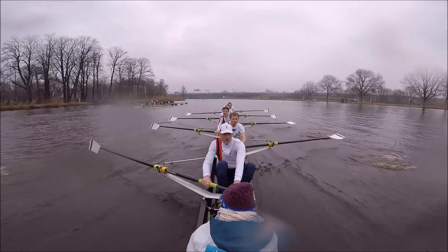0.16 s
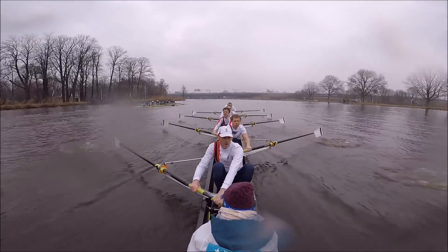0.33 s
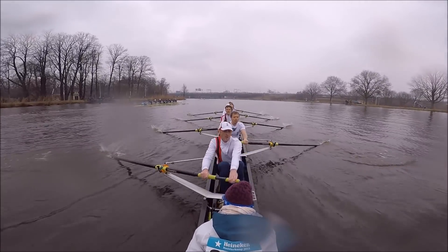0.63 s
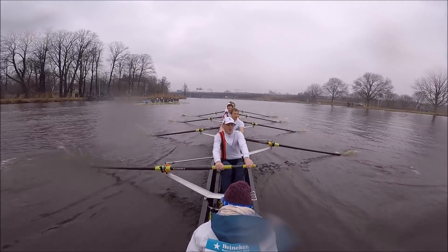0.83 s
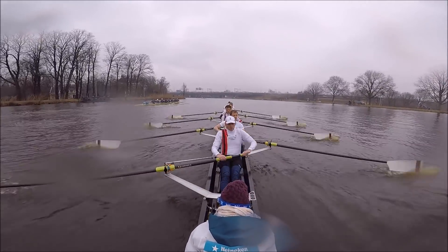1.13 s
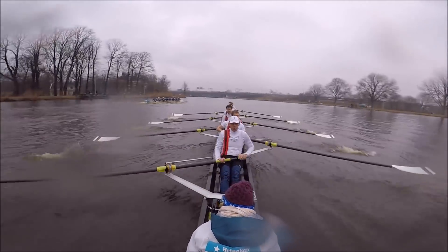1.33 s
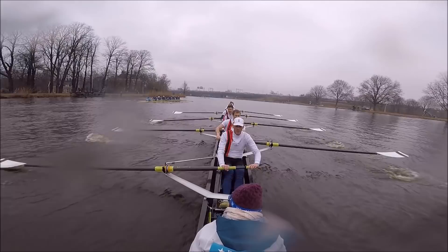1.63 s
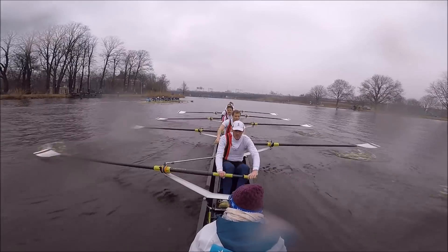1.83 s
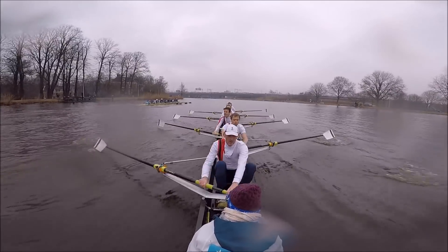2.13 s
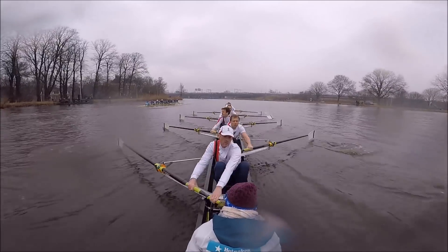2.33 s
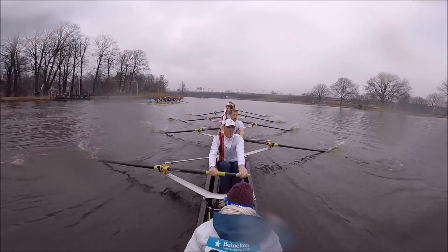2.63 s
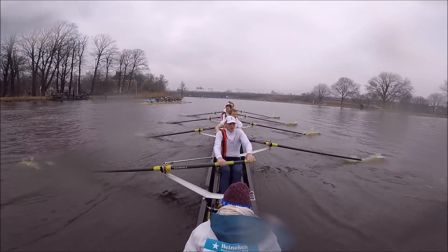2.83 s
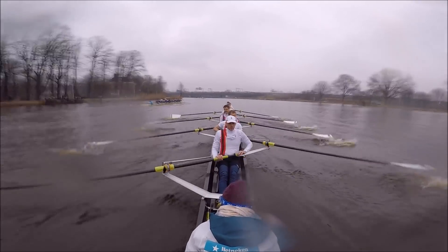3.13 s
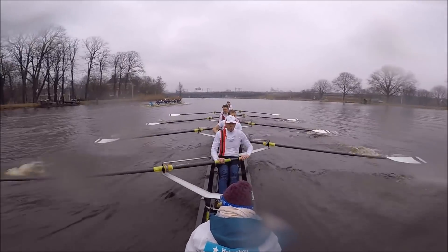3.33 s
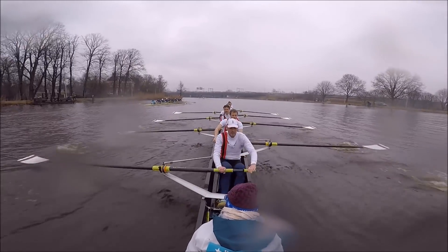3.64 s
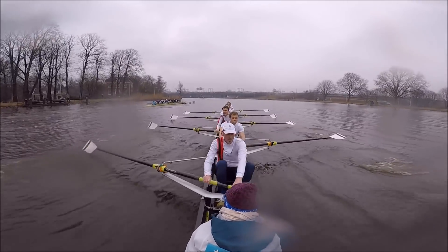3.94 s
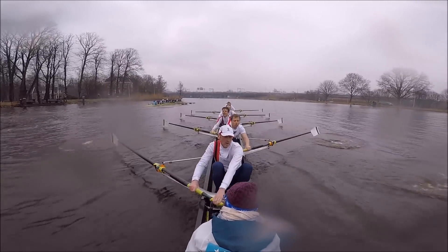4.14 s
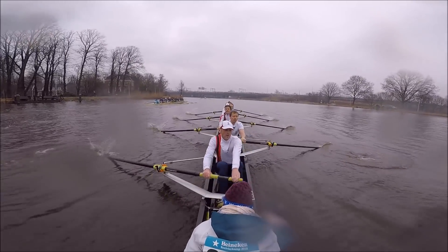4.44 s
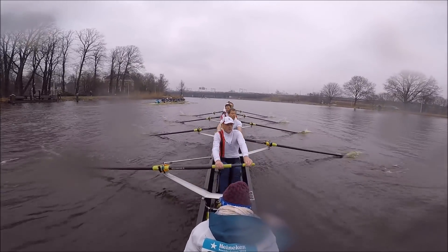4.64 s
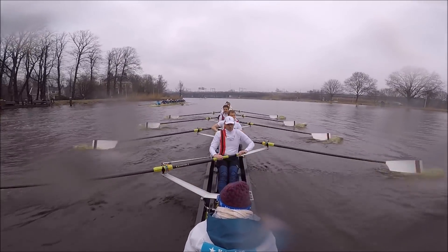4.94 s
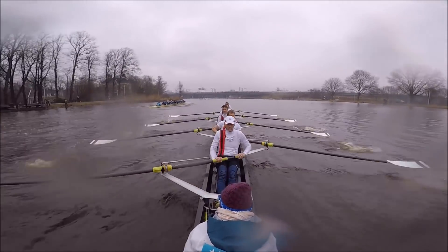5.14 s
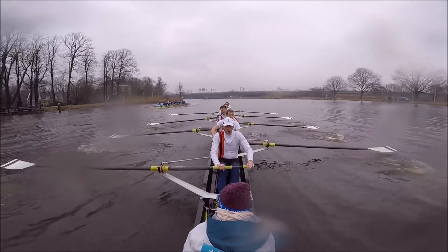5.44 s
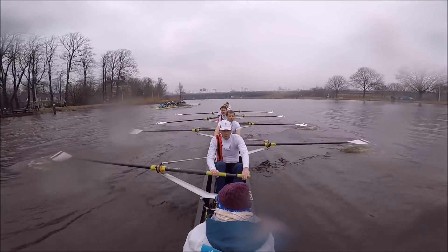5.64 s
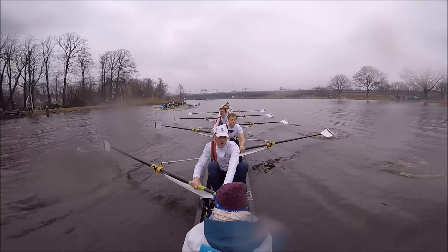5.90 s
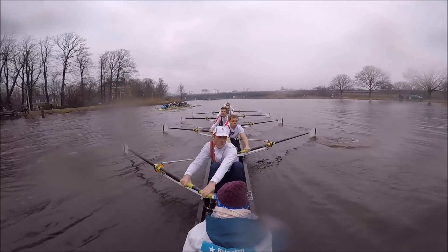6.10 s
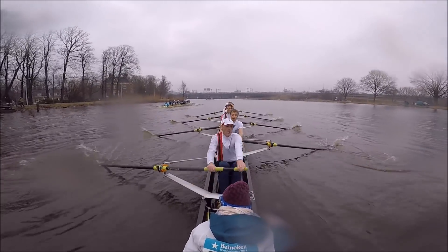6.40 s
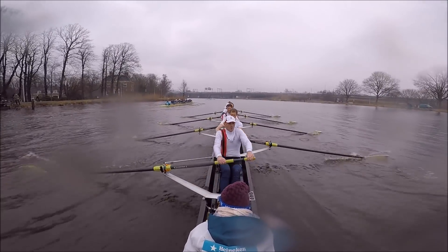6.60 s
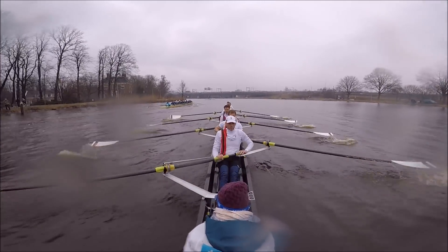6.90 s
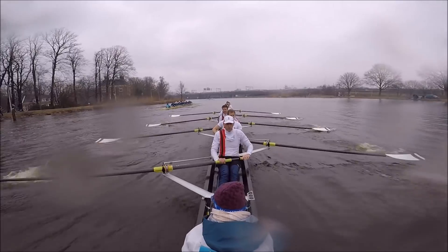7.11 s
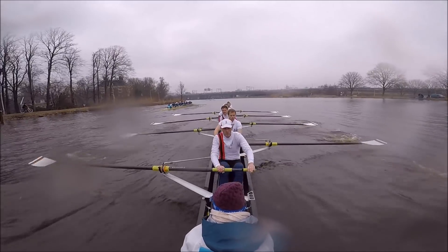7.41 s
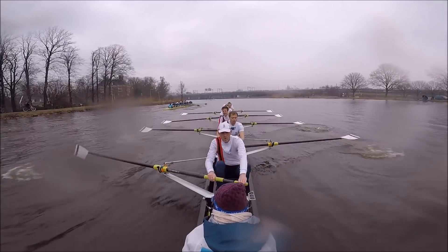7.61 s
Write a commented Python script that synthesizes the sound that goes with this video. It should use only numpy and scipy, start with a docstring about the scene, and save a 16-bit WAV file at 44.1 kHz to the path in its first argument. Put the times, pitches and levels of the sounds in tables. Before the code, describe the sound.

Oars clunk and clack in their locks at each stroke of a rowing eight, with hollow hull booms, rolling seats, bubbling water and low wind.

```python
"""Oars knock and clack, a hollow hull booms and drones, and water washes past: a racing eight rows four strokes.
The place is the stern, where a case with two microphone ports is fixed to the shell.
Blows, rolling seats and rattling fittings are pulses and noise played through resonances of hull, rigger and lock.
Bubbles and drops are short rings or grains of noise; wash, spray and wind are shaped noise behind them."""
import sys
import numpy as np
from scipy import signal
from scipy.fft import rfft, irfft
from scipy.io import wavfile
from scipy.ndimage import uniform_filter1d

SR = 44100
rng = np.random.default_rng(int(sys.argv[2]) if len(sys.argv) > 2 else 0)


def bounce(signal):
    """Save signal as a 16-bit WAV file at the path given by the first command-line argument."""
    frames = np.transpose(np.atleast_2d(signal))
    limited = np.clip(frames, -1, 1)
    pcm = np.round(limited * 32767).astype(np.int16)
    wavfile.write(sys.argv[1], SR, pcm)


N = 342216
TIME = np.arange(N) / SR
FREQ = np.maximum(np.fft.rfftfreq(N, 1 / SR), 1).astype(np.float32)

# Levels are relative within a table; most sources add a trim of their own.
# Mid moves both ports alike, side rocks them against each other.

# finish of each stroke: (time [s], nearest sleeve level [dB], lead of the next sleeve [s],
# next sleeve level [dB], gate level [dB] above the nearest sleeve, effort of the stroke [dB])
FINISHES = [(1.413, -6, 0.044, -19, -2.5, -0.04), (3.3114, -5.5, .055, -20, 3, 1),
            (5.1741, -7, 0.014, -19, -1.5, 0), (7.0665, -6, 0.036, -15.5, 0.5, 1.5)]
STROKE_S, RECOVERY_STARTS_S = 1.868, 0.33  # one whole stroke; the seats set off this long after a finish
# crew's movement in every stroke: (time from the finish [s], rolling seats level [dB], rigging rattle level [dB])
CREW = [(-1.498, -29.5, -42.5), (-1.178, -18, -33), (-0.807, -12.5, -26), (-0.78, -18, -36.5),
        (-0.657, -14.5, -26), (-0.566, -17.5, -31), (-0.303, -19.5, -34), (-0.2, -25, -36.5),
        (-0.052, -11, -21.5), (0.134, -14.5, -32.5), (0.26, -28, -46)]
# water in every stroke: (time from the finish [s], hull wash level [dB], blade spray level [dB])
WATER = [(-1.356, -45.5, -54.5), (-1.04, -40.5, -50), (-0.48, -44.5, -51.5), (-0.246, -42, -45.5),
         (-0.093, -41, -42.5), (-0.022, -37, -45.5), (0.013, -36, -41), (0.022, -46, -49.5),
         (0.29, -48, -52)]

# blows on the hull as oars square, load, come out and drop, and as seats and feet bump:
# (time [s], level [dB], brightness [dB])
THUMPS = [(0.39, -19, 6), (0.488, -25.5, 2), (0.527, -12.5, 2), (0.559, -17.5, 0), (0.649, -30, 1),
          (0.74, -22, 8.5), (0.94, -22, -2), (1.308, -25, -2), (1.33, -19.5, 3), (1.369, -17, 3),
          (1.415, -21, 0), (1.495, -20.5, -7), (1.601, -32.5, 11.5), (2.153, -25, 2), (2.332, -30, 5),
          (2.381, -23.5, 4), (2.445, -12.5, -3), (2.604, -25, 1), (2.646, -18, -1), (3.175, -17, 3),
          (3.222, -15.5, 1.5), (3.272, -10.5, -5), (3.312, -17, 5), (3.374, -17.5, -1), (3.41, -23, 5.5),
          (3.44, -26, -2), (4.113, -28, 8), (4.232, -19, 7), (4.321, -14.5, -1.5), (4.372, -14, -7),
          (4.488, -19, -6), (4.735, -29.5, -2), (5.03, -16.5, -4), (5.07, -19.5, 1), (5.109, -16, 1),
          (5.158, -11.5, 7.5), (5.221, -20, 2), (5.256, -17.5, -3), (5.82, -25, 9), (6.023, -16, -0.5),
          (6.061, -18.5, -9), (6.178, -15, -2.5), (6.198, -16.5, 2.5), (6.283, -16.5, -7), (6.372, -18, 0),
          (6.699, -27, 0), (6.901, -21, 6), (6.972, -11.5, 0), (6.996, -19, -2), (7.028, -14.5, 3),
          (7.131, -20, 3), (7.17, -17.5, 2)]
# resonances of the hull: (frequency [Hz], width [Hz], mid level [dB], side level [dB])
HULL = [(122, 7.4, -15, -6), (187.6, 5.6, 8, 15), (319.7, 10, 5.5, -1), (377, 34.3, 2.5, 4),
        (422, 17.6, 0, 9), (449, 14, 0, 1.5), (614.7, 28, -4.5, 3), (640, 77, -19, -38), (870, 45, -11, 3),
        (1270, 560, -16, -24)]
# dead thud of the skin around a blow: (frequency [Hz], level [dB per Hz])
THUD_TONE = [(90, -18), (170, -8.5), (215, 6), (260, -4.5), (340, -0.5), (400, 2), (480, 6), (550, -9.5),
             (670, 2.5), (780, -18), (920, -12), (1100, -25.5), (2000, -35), (6000, -76)]
THUD_DB, THUD_SIDE_DB = 29.5, 2  # gain of the thud; its side above its mid
# a loom knocks against its pin: (time [s], level [dB])
PIN_KNOCKS = [(0.388, -20.5), (0.533, -13.5), (0.545, -17.5), (1.33, -16), (1.369, -13), (1.601, -23),
              (2.438, -14.5), (2.452, -9.5), (4.322, -10.5), (4.373, -13), (4.487, -16), (5.125, -18),
              (5.158, -16), (6.026, -14), (6.176, -16), (6.198, -12), (6.903, -20), (7.028, -13)]
# resonances of pin and rigger: (frequency [Hz], width [Hz], mid level [dB], side level [dB])
RIGGER = [(504, 27, 9, 9.5), (618, 36, 10, 9), (613, 34, -1, 12.5), (825, 40, -13, 0), (888, 28, -5, 14.5),
          (1110, 99, -15, -9)]
# resonances of oarlock and sleeve: (frequency [Hz], width [Hz], mid level [dB], side level [dB])
LOCK = [(626, 84, -9, -0.5), (930, 110, 0, 8), (1280, 85, 4.5, 4), (1530, 124, 3.5, 2),
        (1688, 120, -0.5, 2), (1910, 84, -5.5, -4)]
# resonances of the gate that closes the lock: (frequency [Hz], width [Hz], mid level [dB], side level [dB])
GATE = [(3400, 700, -12, -18), (4450, 460, 0, -17)]
TOUCH_S, TOUCH_DB = 0.00482, -8.5  # a sleeve's edge touches this much earlier and softer than its flat
SCUFF_S, SCUFF_DB = 0.00131, -7.5  # and scuffs once more just before it seats
BOUNCE_S, BOUNCE_DB, BOUNCE_FADE_DB = 0.0059, -13, -5  # mean gap, first bounce, each further one
# the farther oars are feathered a little early or late: before and after the finish, strongest level
CLATTER_EARLY_S, CLATTER_LATE_S, CLATTER_DB = .1, .06, -22
# low modes of the shell, stirred as the crew's weight surges:
# (time [s], nominal frequency [Hz], length [s], rms level at the top [dB])
BOOMS = [(0.17, 202, 0.38, -29.5), (0.346, 113, 0.29, -13.5), (0.695, 108.9, 0.3, -19.5),
         (0.968, 41, 0.26, -16.5), (1.32, 111.3, 0.25, -15), (1.353, 186.6, .12, -19.5),
         (1.481, 124, 0.32, -22), (1.554, 37, .3, -17.5), (2.355, 109.3, .2, -18.5),
         (2.417, 208.1, 0.19, -22.5), (2.522, 101.8, 0.24, -20), (3.328, 110.9, 0.27, -15.5),
         (3.428, 37.1, 0.4, -19), (3.478, 124, .2, -18.5), (4.23, 107.8, 0.34, -17.5),
         (4.333, 190.4, .22, -23), (4.868, 55.8, 0.13, -21), (5.112, 110, 0.17, -17),
         (5.218, 119.5, 0.23, -18.5), (5.231, 189.7, .14, -16.5), (6.031, 112, 0.29, -13.5),
         (6.296, 112.2, 0.3, -15.5), (6.945, 111.5, 0.21, -20.5), (7.124, 38.36, 0.51, -14.5),
         (7.176, 118.5, .17, -16)]
# resonances of the slides under the seats: (frequency [Hz], width [Hz], mid level [dB], side level [dB])
SLIDES = [(89.6, 13, -10.5, -17.5), (113, 7.9, -3, -12.5), (124.9, 7.6, -8, -10), (185.6, 11.4, -9, -20),
          (203.5, 7.4, -12, -3.5)]
# groan of a dry sleeve in its lock: (time [s], length [s], frequency [Hz], width [Hz], level [dB])
GROAN = (2, .22, 749, 35, -38)

# blades tear out of the water:
# (time [s], length [s], low churn level [dB], time of the spray peak [s], gritty spray level [dB])
RELEASES = [(1.328, .11, -31, 1.33, -41.5), (3.167, 0.13, -32.5, 3.3, -39),
            (5.027, 0.19, -27, 5.125, -41.5), (6.95, .13, -32, 7, -40.5)]
# churn as the hull passes it on: (frequency [Hz], level [dB per Hz])
CHURN_TONE = [(120, -23), (175, 7), (225, 10), (290, -8), (420, 1.5), (540, -11.5), (660, -12.5),
              (900, -16), (1500, -23), (2200, -29.5), (4000, -64)]
# gritty spray of the release: (frequency [Hz], level [dB per Hz])
GRIT_TONE = [(400, -19), (1000, -4), (1700, 3), (2400, 1.5), (3300, 8), (4500, -3), (6500, -17),
             (12000, -37)]
GRIT_RISE_S, GRIT_FALL_S = .035, .04
# air pockets trapped by blades going in and coming out: (time [s], frequency [Hz], level [dB])
GULPS = [(0.535, 318, -16), (1.335, 410, -15), (1.372, 385, -17.5), (3.223, 400, -17.5),
         (3.272, 299, -15.5), (3.285, 438, -15), (4.374, 359, -19), (5.03, 401, -16), (5.1, 438, -16),
         (6.198, 330, -18.5), (6.975, 450, -18), (7.045, 369, -16.5)]
# spray thrown up at the catch: (time [s], length [s], level [dB])
SPLASHES = [(0.709, 0.083, -37), (2.589, 0.12, -42.5), (4.458, 0.12, -41), (6.364, 0.09, -39)]
# spray landing on the case: (frequency [Hz], level [dB per Hz])
SPLASH_TONE = [(300, -14), (1200, 10), (2800, 2.5), (4500, 2), (6200, 0.5), (8000, -9), (12000, -21.5),
               (14000, -43)]
# fizz and droplets off the blades: (frequency [Hz], level [dB per Hz])
SPRAY_TONE = [(100, -30.5), (900, 8.5), (2200, 6.5), (3800, 4.5), (5000, 1), (6200, -0.5), (8000, -8.5),
              (10000, -12), (12200, -23.5), (14000, -46.5)]
# how the ports differ for water heard through the case: (frequency [Hz], side minus mid [dB])
SPRAY_SIDE = [(1500, -7.5), (2800, -5.5), (4200, -8), (6200, -1), (12000, 2)]
# largest drops and clicks at the case: (time [s], level [dB], ring frequency [Hz], rattle decay [s])
TICKS = [(0.388, -38, 3800, 0.0056), (0.649, -31.5, 3300, 0.0062), (0.7135, -29, 3850, 0.0027),
         (0.735, -23.5, 3150, 0.0029), (0.7448, -25, 5630, 0.009), (0.790, -33, 5500, .003),
         (0.841, -38, 6000, 0.00089), (1.096, -27.5, 5600, 0.018), (1.335, -29.5, 5650, 0.0058),
         (1.3715, -27, 4900, 0.0034), (1.387, -25.5, 4500, 0.0021), (1.429, -32, 4500, 0.0039),
         (1.4945, -33, 4100, 0.0059), (1.8642, -34, 3650, .006), (2.295, -26.5, 5170, 0.0034),
         (2.55, -33.5, 5660, 0.0065), (2.598, -27.5, 5530, 0.0041), (2.6566, -29, 3800, 0.012),
         (2.679, -19, 3040, 0.004), (2.7775, -35, 4600, .002), (2.993, -31, 4500, 0.0074),
         (3.253, -24, 3200, 0.01), (3.2682, -26.5, 4240, .003), (3.272, -29, 4600, .0015),
         (3.288, -36, 4400, 0.0013), (3.341, -41, 4600, .001), (3.375, -39, 4900, .002),
         (3.596, -44, 4500, .002), (3.615, -37.5, 4500, .004), (4.215, -37, 4000, 0.0048),
         (4.231, -28, 4130, 0.0067), (4.3787, -34, 4200, .006), (4.5083, -32, 4500, .004),
         (4.531, -27.5, 4070, .004), (5.1357, -27, 3800, 0.0045), (5.1647, -25, 4200, 0.0029),
         (5.408, -28, 3970, 0.0075), (6.026, -31.5, 4130, .005), (6.213, -33, 3710, 0.0065),
         (6.2922, -27.5, 4750, 0.0047), (6.31, -30, 3940, .003), (6.391, -36, 3900, 0.0053),
         (6.831, -35, 4200, .008), (6.979, -30, 4170, .003), (7.0274, -24, 3080, 0.0037),
         (7.037, -23.5, 3460, 0.0073)]
# rattle of the ticks: (frequency [Hz], level [dB per Hz])
TICK_TONE = [(300, -33), (1500, -4), (2800, 5.5), (4500, 5.5), (6200, 2), (8000, -11), (12000, -20.5),
             (14000, -46)]
DRIP_SPAN_S, DRIP_TOP_HZ, DRIP_DB = .5, 5000, 10  # drips fall this long before a finish; highest pitch; gain
# bubbles beside the hull: (time [s], starting frequency [Hz], level [dB])
PLOPS = [(0.419, 1520, -27), (0.81, 1420, -33), (2.36, 1124, -25), (2.624, 1535, -26.5), (4.241, 1410, -29),
         (4.51, 1500, -33), (4.656, 940, -22), (5.559, 1070, -34), (5.81, 1410, -31), (6.33, 1500, -28.5),
         (6.516, 1570, -27), (7.41, 970, -31)]
# wash along the hull: (frequency [Hz], level [dB per Hz])
WASH_TONE = [(40, -28), (250, -6), (450, 3.5), (760, -1.5), (900, -3.5), (1080, 1), (1600, 3.5),
             (2050, -1.5), (2400, -10.5), (3500, -34.5), (6000, -28), (14000, -74)]
# how the ports differ for the wash: (frequency [Hz], side minus mid [dB])
WASH_SIDE = [(250, -32), (500, 11.5), (900, 4), (1500, 3.5), (2100, -2), (4000, 11.5)]
# wind at the case: (time [s], level [dB])
WIND = [(0.0, -24.5), (0.82, -17), (0.86, -19), (1.1, -21), (1.19, -25.5), (1.23, -19), (1.71, -18),
        (2.03, -21), (2.53, -15.5), (3.11, -21), (3.26, -15.5), (4.0, -23), (4.32, -18), (5.47, -15.5),
        (5.53, -20.5), (6.89, -17), (7.33, -17.5), (7.76, -20.5)]
# wind spectrum: (frequency [Hz], level [dB per Hz])
WIND_TONE = [(12, -41.5), (24, -15), (37, 7.5), (48, 3.5), (58, 1), (74, 1), (86, -7.5), (110, -3),
             (160, -21.5), (400, -67), (4000, -130)]
# how the ports differ for the wind: (frequency [Hz], side minus mid [dB])
WIND_SIDE = [(30, -7), (60, -9), (120, -5.5)]
# the two ports of the case: (frequency [Hz], left minus right [dB])
PORT_BALANCE = [(30, -0.4), (70, -2), (180, -0.5), (350, 3.5), (700, -3.5), (1400, -2), (3000, -1.3),
                (5500, 0), (8000, -3), (13000, -13.5)]
TOP_HZ = 14500  # upper limit of the microphone ports


def undb(db):
    """Turn decibels into an amplitude factor."""
    return 10 ** (np.asarray(db) / 20)


def curve(rows, axis):
    """One column of a table as a gain over time."""
    rows = np.array(rows)
    return undb(np.interp(TIME, rows[:, 0], rows[:, axis]))


def each_stroke(rows, axis):
    """One column of a one-stroke table as a gain over time, repeated around every finish and scaled by effort."""
    finishes = np.array(FINISHES)
    finish, effort_db = finishes[:, 0], finishes[:, -1]
    effort = np.interp(TIME, finish - STROKE_S / 2, effort_db)
    finish = np.r_[finish[0] - STROKE_S, finish, finish[-1] + STROKE_S]
    since = TIME - finish[np.searchsorted(finish + RECOVERY_STARTS_S, TIME)]
    rows = np.array(rows)
    return undb(effort + np.interp(since, rows[:, 0], rows[:, axis], period=STROKE_S))


def tone(points):
    """Gain over frequency, interpolated in dB along log frequency."""
    hz, db = np.transpose(points)
    return undb(np.interp(np.log(FREQ), np.log(hz), db))


def even_tone(points):
    """Gain over frequency, scaled to rms 1."""
    gain = tone(points)
    return gain / np.sqrt(np.mean(gain ** 2))


def unit(pair):
    """Scale a mid/side pair so that its mid has rms 1."""
    return pair / np.std(pair[0])


def ports(force, mid, side, shared):
    """Filter two forces into mid and side; the shared part of the side is a quarter cycle ahead."""
    first, second = rfft(force)
    shared = np.clip(shared, 0, 1)
    side_force = 1j * shared * first + np.sqrt(1 - shared ** 2) * second
    return irfft([first * mid, side_force * side], N)


def ring(force, modes, shared):
    """Play a force through a set of resonances."""
    mid = side = 0
    for hz, width, mid_db, side_db in np.float32(modes):
        mode = 1 / (1 + 1j * (hz / width * (FREQ / hz - hz / FREQ)))
        mid = mid + float(undb(mid_db)) * mode
        side = side + float(undb(side_db)) * mode
    return ports(force, mid, side, shared)


def soften(x, hz, kind="low", order=2):
    """Smooth low-pass or high-pass."""
    return signal.sosfilt(signal.butter(order, hz, kind, fs=SR, output="sos"), x)


def walk(rate):
    """Slow random wandering around zero, with a spread near 1."""
    k = int(SR / rate)
    steps = np.repeat(rng.standard_normal(N // k + 1), k)
    return 1.3 * uniform_filter1d(uniform_filter1d(steps, k), k)[:N]


def grains(rate, spread_db):
    """Random tiny impacts, a few much larger than the rest, felt differently by mid and side."""
    size = undb(spread_db * np.minimum(rng.exponential(size=N), 4))
    struck = rng.random(N) < rate / SR
    return unit(struck * size * rng.standard_normal((2, N)))


def add(force, start, db, chatter, chatter_s):
    """Add one blow to a force: a sharp contact, then dying chatter."""
    t = np.arange(4096) / SR
    blow = rng.standard_normal((2, len(t))) * np.exp(-t / chatter_s)
    blow *= chatter / np.linalg.norm(blow[0])
    blow[:, 0] += 1
    i = int(start * SR)
    force[:, i:i + len(t)] += undb(db) * blow[:, :N - i]


def ping(start, hz, decay_s, rise_s, glide):
    """One dying resonance whose pitch rises by the share glide per decay time."""
    out, i = np.zeros(N), int(start * SR)
    t = TIME[:min(SR // 10, N - i)]
    swell = np.exp(-t / decay_s) * (1 - np.exp(-t / rise_s))
    out[i:i + len(t)] = swell * np.sin(2 * np.pi * hz * t * (1 + glide * t / decay_s / 2))
    return out


def case(force, points):
    """Water sounds as they come through the wall of the case."""
    colour = even_tone(points)
    return ports(force, colour, colour * tone(SPRAY_SIDE), shared=.15)


def knocks():
    """Each blow thuds on the skin and rings the hull; its brightness sets the treble of the force."""
    dull, hard = np.zeros((2, 2, N))
    for start, db, bright_db in THUMPS:
        add(dull, start, db, chatter=1.0, chatter_s=0.011)
        add(hard, start, db + bright_db, chatter=1.0, chatter_s=0.014)
    force = undb(38.0) * soften(dull, hz=493) + undb(27.0) * soften(hard, hz=487, kind="high")
    thud = ports(dull, tone(THUD_TONE), tone(THUD_TONE) * undb(THUD_SIDE_DB), shared=0.2)
    return soften(ring(force, HULL, shared=0.96), hz=1740) + undb(THUD_DB) * thud


def pins():
    """The loom takes up its play against the pin with a short woody knock."""
    force = np.zeros((2, N))
    for start, db in PIN_KNOCKS:
        add(force, start, db, chatter=.9, chatter_s=.008)
    knock = soften(ring(force, RIGGER, shared=0.75), hz=1160, order=3)
    return undb(26) * soften(knock, hz=330, kind="high")


def clacks():
    """At the finish the sleeve scuffs into the plastic lock, slaps flat, bounces and rattles its gate."""
    force, shake = np.zeros((2, 2, N))
    for finish, nearest_db, lead, next_db, gate_db, _ in FINISHES:
        for start, db in (finish - lead, next_db), (finish, nearest_db):
            add(force, start - TOUCH_S, db + TOUCH_DB, chatter=0.7, chatter_s=0.004)
            add(force, start - SCUFF_S, db + SCUFF_DB, chatter=0.69, chatter_s=0.002)
            add(force, start, db, chatter=.4, chatter_s=.002)
        # seven softer slaps from the farther oars
        for when, softness in rng.random((7, 2)):
            start = finish - CLATTER_EARLY_S + when * (CLATTER_EARLY_S + CLATTER_LATE_S)
            add(force, start, CLATTER_DB - 8 * softness, chatter=.5, chatter_s=.002)
        add(shake, finish, nearest_db + gate_db, chatter=1.0, chatter_s=0.0018)
        delays = np.cumsum(BOUNCE_S * (.5 + rng.random(size=4)))
        for k, delay in enumerate(delays):
            bounce_db = nearest_db + BOUNCE_DB + k * BOUNCE_FADE_DB
            add(force, finish + delay, bounce_db, chatter=1, chatter_s=0.0031)
    body = soften(ring(force, LOCK, shared=.5), hz=2100, order=12)
    gate = soften(ring(shake, GATE, shared=.2), hz=3000, kind="high", order=4)
    return undb(24.5) * body + undb(9.5) * soften(gate, hz=5600, order=4)


def rattle():
    """Loose play in eight riggers, heard as fine random impacts, keeps the hull muttering."""
    impacts = soften(grains(rate=1000, spread_db=0.5), hz=265, kind="high", order=3)
    hull = soften(ring(impacts, HULL, shared=0.96), hz=936, order=3)
    return unit(hull) * each_stroke(CREW, axis=2) * undb(-2.0 + 1.3 * walk(rate=20))


def booms():
    """As the crew's weight surges, a low mode of the shell swells and dies away."""
    out = np.zeros((2, N))
    waver = np.cumsum(1 + 0.01502 * walk(rate=12)) / SR  # time that runs slightly unevenly bends the pitch
    for start, hz, length, db in BOOMS:
        span = slice(int(start * SR), int((start + length) * SR))
        age = np.clip((TIME[span] - start) / length, 0, 1)
        swell = np.sqrt(2) * undb(db) * np.sin(np.pi * age ** 0.63)
        phase = 2 * np.pi * (hz * waver[span] + rng.random())
        # higher modes rock the case more
        out[:, span] += swell * np.array([np.sin(phase), hz / 260 * np.cos(phase)])
    return out


def seats():
    """Seat wheels rumble on the slides and make the shell drone."""
    drone = soften(ring(rng.standard_normal((2, N)), SLIDES, shared=0.76), hz=208.0, order=4)
    return unit(soften(drone, hz=76, kind="high")) * each_stroke(CREW, axis=1) * undb(-6.0)


def groan():
    """A dry sleeve sticks and slips briefly on one resonance."""
    start, length, hz, width, db = GROAN
    slips = unit(ring(grains(rate=500, spread_db=3), [(hz, width, 0, 4)], shared=.7))
    swell = np.sin(np.pi * np.clip((TIME - start) / length, 0, 1))
    return soften(slips, hz=1200) * undb(db) * swell


def releases():
    """As the blades come out, their puddles collapse in a low churn and throw coarse spray."""
    churn = grit = 0
    for start, length, churn_db, peak, grit_db in RELEASES:
        churn_shape = np.interp((TIME - start) / length, [0, .02, .8, 1.2], [0, 1, 1, 0])
        grit_shape = np.exp(-np.maximum((peak - TIME) / GRIT_RISE_S, (TIME - peak) / GRIT_FALL_S))
        churn = churn + undb(churn_db) * churn_shape
        grit = grit + undb(grit_db) * grit_shape
    lumps, drops = grains(rate=700, spread_db=1), grains(rate=1500, spread_db=2.5)
    colour = even_tone(CHURN_TONE)
    return ports(lumps * churn, colour, colour * undb(5), shared=.5) + case(drops * grit, GRIT_TONE)


def gulps():
    """Each large pocket of air rings hollowly for a few cycles and rocks the case."""
    pockets = sum(undb(db) * ping(start, hz, decay_s=0.015, rise_s=.0012, glide=.004)
                  for start, hz, db in GULPS)
    # the slope puts the side a quarter cycle ahead, scaled around 430 Hz
    rocking = np.gradient(pockets) * SR / (2 * np.pi * 430)
    return np.array([pockets, 1.5 * rocking])


def spray():
    """Fizz and droplets follow the blades through each stroke; spray thrown at the catch patters down."""
    fizz = grains(rate=12000, spread_db=1) * undb(walk(rate=18))
    drops = grains(rate=220, spread_db=2.3) * undb(-7.5)
    off_blades = (fizz + drops) * each_stroke(WATER, axis=2) * undb(.5)
    patter = grains(rate=3000, spread_db=2.3) * undb(2.4 * walk(rate=110) - 1.8)
    thrown = 0
    for start, length, db in SPLASHES:
        age = np.maximum(TIME - start, 0) / length
        swell = (2.5 * age) ** 2 * np.exp(2 - 5 * age)  # strongest at 0.4 of the length
        ripple = 1 + .25 * np.cos(2 * np.pi * (age - .4))
        thrown = thrown + undb(db) * swell * ripple
    return case(off_blades, SPRAY_TONE) + case(patter * thrown * undb(1.5), SPLASH_TONE)


def droplets(count):
    """Each splash breaks into drops that land with tiny rings of their own."""
    out = np.zeros((2, N))
    for start, length, db in SPLASHES:
        for when, size, strength, across in rng.random((count, 4)):
            landing = start + length * (.15 + .7 * when)
            tiny_ring = ping(landing, 4500 * 4 ** -size, decay_s=.0014, rise_s=.0002, glide=.02)
            drop = undb(db + 9) * strength * tiny_ring
            out[0] += drop
            out[1] += (across - .5) * drop
    return soften(out, hz=6000, order=4)


def ticks():
    """Single drops tick on the case and fittings click, each with its own short ring."""
    force, rings = np.zeros((2, N)), 0
    for start, db, hz, rattle_s in TICKS:
        add(force, start, db + 6, chatter=2.4, chatter_s=rattle_s)
        rings = rings + undb(db - 5) * ping(start, hz, decay_s=.0009, rise_s=.0002, glide=0)
    return case(force, TICK_TONE) + soften(rings, hz=8000, order=4) * np.array([[1], [-.3]])


def drips(count):
    """Drops fall from the blades into the puddles late in each drive; each traps a tiny ringing bubble."""
    drops = np.zeros(N)
    for finish, *_ in FINISHES:
        for early, size, strength in rng.random((count, 3)):
            start, hz = finish - early * DRIP_SPAN_S, DRIP_TOP_HZ * 4 ** -size
            drops += strength ** 2 * ping(start, hz, decay_s=.0025, rise_s=.0003, glide=.02)
    drops = soften(drops, hz=6000, order=6)
    return drops * each_stroke(WATER, axis=2) * undb(DRIP_DB) * np.array([[1], [-.6]])


def plops():
    """A few larger bubbles ring and rise in pitch."""
    bubbles = sum(undb(db) * ping(start, hz, decay_s=0.0088, rise_s=0.00065, glide=0.032)
                  for start, hz, db in PLOPS)
    return bubbles * np.array([[1], [1.4]])


def gurgles(count):
    """Stray bubbles stand out of the wash, each ringing at the pitch of its size."""
    bubbles = np.zeros(N)
    for when, size, strength in rng.random((count, 3)):
        start, hz = when * TIME[-1], 1900 * 3 ** -size
        bubbles += strength * ping(start, hz, decay_s=.007, rise_s=.001, glide=.04)
    return bubbles * each_stroke(WATER, axis=1) * undb(10) * np.array([[1], [1.3]])


def wash():
    """Small bubbles and ripples stream along the hull as dense, slowly lapping grains."""
    lapping = undb(1.1 * walk(rate=30))
    bubbles = grains(rate=3200, spread_db=1.3) * lapping
    stream = ports(bubbles, tone(WASH_TONE), tone(WASH_TONE) * tone(WASH_SIDE), shared=0.64)
    return unit(stream) * each_stroke(WATER, axis=1) * undb(1.0)


def wind():
    """Air buffets the case as a low, uneven rumble."""
    noise = rng.standard_normal((2, N))
    air = ports(noise, tone(WIND_TONE), tone(WIND_TONE) * tone(WIND_SIDE), shared=0.66)
    return unit(air) * curve(WIND, axis=1) * undb(0.42)


def scene():
    """Add boat, water and wind, then turn mid and side into left and right ports."""
    boat = knocks() + pins() + clacks() + rattle() + booms() + seats() + groan()
    blades = releases() + gulps() + spray() + droplets(count=40) + ticks() + drips(count=35)
    alongside = plops() + gurgles(count=130) + wash()
    mid, side = boat + blades + alongside + wind()
    return np.array([mid + side, mid - side])


def record(dry):
    """The case colours each port, the loudest peaks are rounded and the top is cut."""
    balance = tone(PORT_BALANCE)
    sound = irfft(rfft(dry) * np.sqrt([balance, 1 / balance]), N)
    sound = sound / (1 + sound ** 6) ** (1 / 6)
    return signal.sosfilt(signal.ellip(8, .2, 70, TOP_HZ, fs=SR, output="sos"), sound)


dry = scene()
out = record(dry)
bounce(out)
```